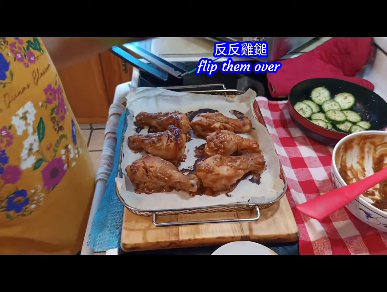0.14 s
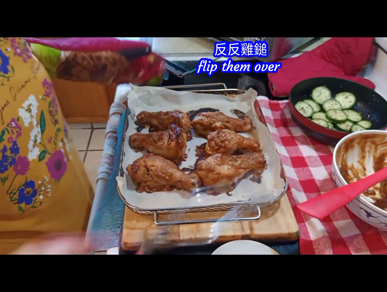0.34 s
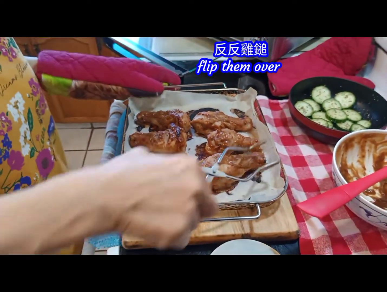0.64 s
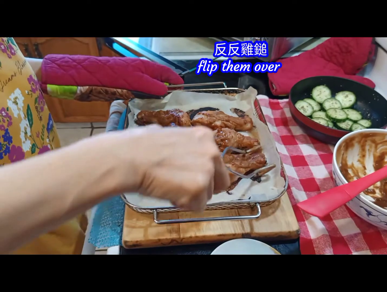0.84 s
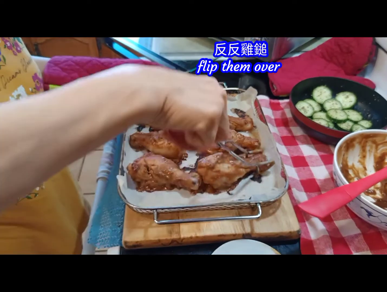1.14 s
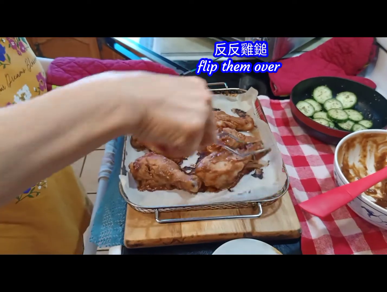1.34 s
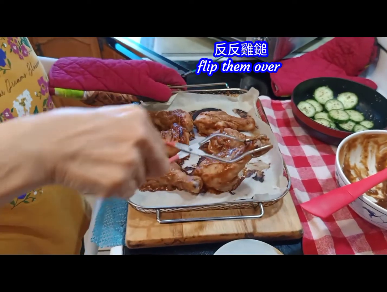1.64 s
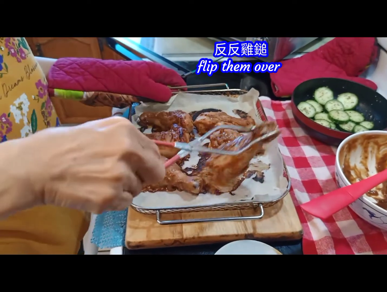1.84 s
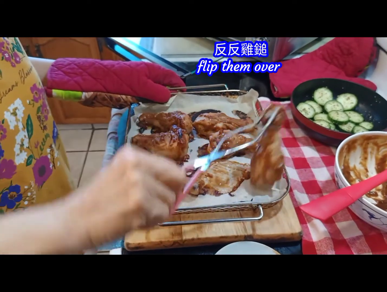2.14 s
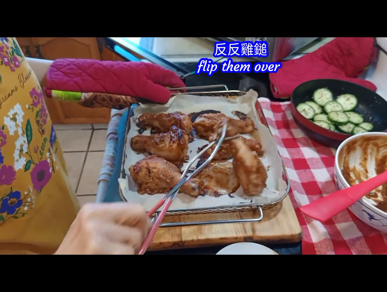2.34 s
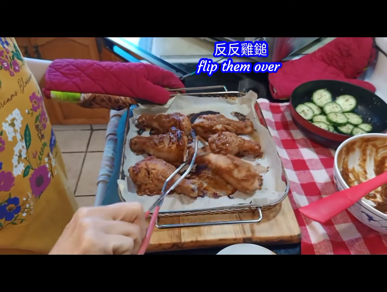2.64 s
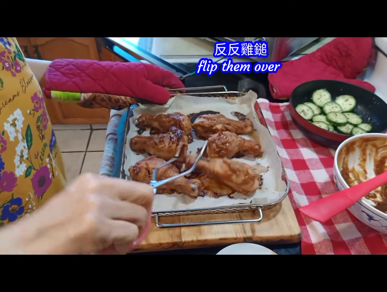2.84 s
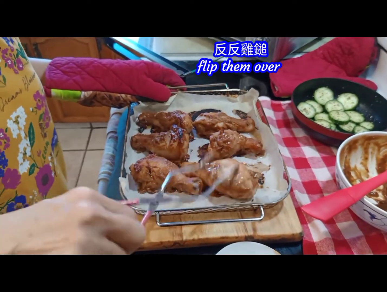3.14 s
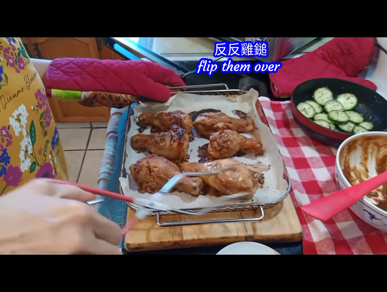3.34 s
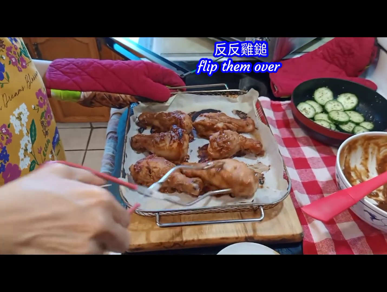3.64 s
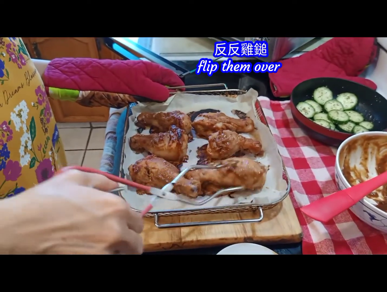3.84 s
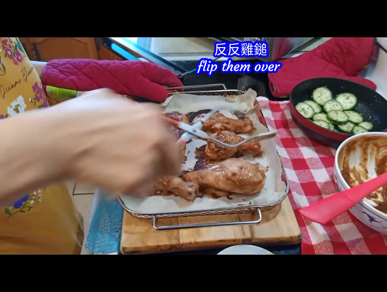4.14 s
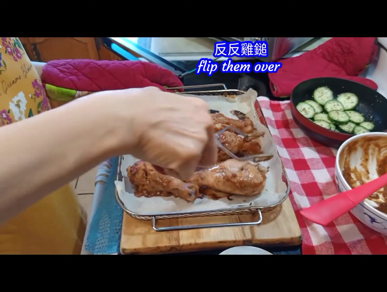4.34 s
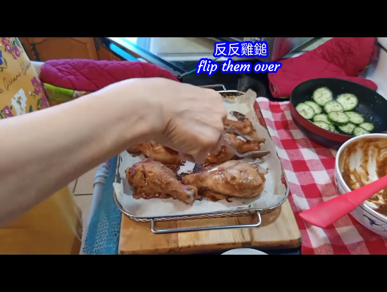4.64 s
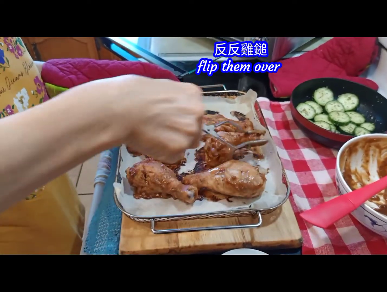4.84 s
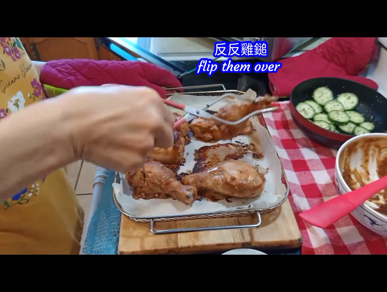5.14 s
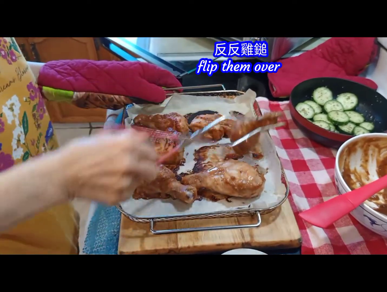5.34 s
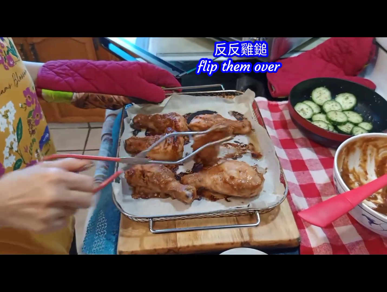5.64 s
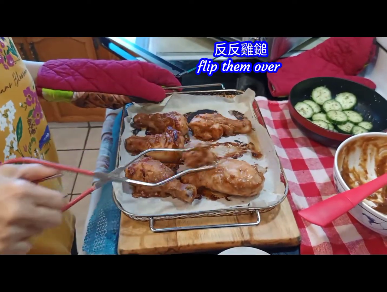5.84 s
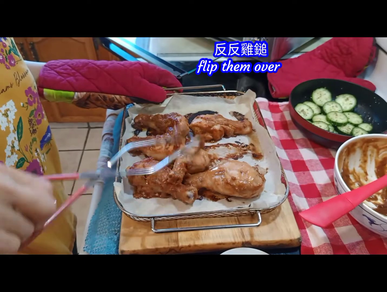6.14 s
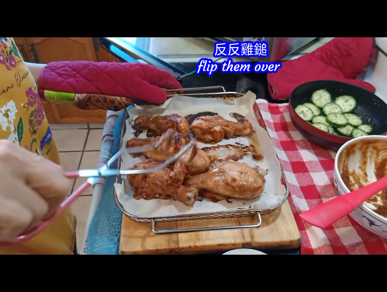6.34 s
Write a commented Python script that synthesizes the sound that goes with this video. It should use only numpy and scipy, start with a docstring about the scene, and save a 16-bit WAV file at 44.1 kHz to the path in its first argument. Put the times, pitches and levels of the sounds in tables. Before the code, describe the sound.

Tongs turn chicken legs on paper in a wire rack, heard close and dry. A quick double clink opens, followed by a rough burst of metallic rattling, paper snaps and low thumps, then separate small ticks and faint scrapes. The later part is sparse, with muffled distant knocks, a late bright click and a quiet airy room hum.

```python
"""Steel tongs turn roast chicken legs on baking paper in a wire basket, close to a phone in a small tiled
kitchen. The tongs tick on bone and wire (noise bursts through resonances) and twice clink together (decaying
sines). Paper scrapes (shaped, grainy noise) and snaps (short bright bursts, also used for a few light ticks);
low thumps sound (noise in resonances). Dull knocks come from further off in the house (reverberant noise, a low
mode); a faint hum of air lies under all."""
import sys
import numpy as np
from scipy import signal
from scipy.fft import rfft, irfft, next_fast_len
from scipy.io import wavfile
from scipy.ndimage import uniform_filter1d

SR = 44100
rng = np.random.default_rng(int(sys.argv[2]) if len(sys.argv) > 2 else 0)


def master(y):
    """Save y as 16-bit WAV."""
    cut = np.clip(np.atleast_2d(y).T, -1, 1)
    pcm = np.round(cut * 32767)  # scale
    wavfile.write(sys.argv[1], SR, pcm.astype(np.int16))


N = 285356  # samples


def amp(db):
    """Decibel law: the amplitude ratio grows tenfold every 20 dB."""
    return 10 ** (np.asarray(db) / 20)


def unit(x):
    """Normalisation to a root mean square of 1."""
    return x / np.sqrt(np.mean(x ** 2) + 1e-20)


def along(points, hz):
    """Interpolation of (pitch_hz, value) points on a logarithmic frequency axis."""
    point_hz, value = np.transpose(points)
    return np.interp(np.log(hz + 1), np.log(point_hz + 1), value)


def filtered(x, response):
    """Linear filtering: the spectrum of x times a complex response of frequency."""
    size = next_fast_len(len(x) + 4096)
    spectrum = rfft(x, size) * response(np.fft.rfftfreq(size, 1 / SR))
    return irfft(spectrum, size)[:len(x)]


def add(track, start_s, x):
    """Superposition: mixes x into track at start_s."""
    part = track[round(start_s * SR):][:len(x)]
    part += x[:len(part)]


def patchy(shape, bands):
    """Band-wise fluctuation: random levels smoothed over neighbouring bands and 14 frames."""
    return unit(uniform_filter1d(uniform_filter1d(rng.standard_normal(shape), bands, 0), 14, 1))


def resonance(f, centre_hz, width_hz):
    """Damped oscillator: its response is 1 at the centre and falls away on both sides."""
    return 1j * f * width_hz / (centre_hz ** 2 - f * f + 1j * f * width_hz)


def tail(t60s, rise_s):
    """Reverberation: a fresh noise answer of energy 1, each frequency dying at its own speed."""
    hz, t, z = signal.stft(rng.standard_normal(SR // 2), SR, nperseg=256)
    decay = amp(-60 * t / along(t60s, hz)[:, None])
    x = signal.istft(z * decay, SR, nperseg=256)[1][:SR // 2]
    x = x * (1 - np.exp(-np.arange(len(x)) / SR / rise_s))
    return x / np.linalg.norm(x)


# spectrum of the air noise: pitch_hz, relative level_db
AIR_SPECTRUM = [(25, -6.5), (100, 0.5), (300, -5), (900, -11.5), (3000, -17.5), (15000, -16)]


def air():
    """Stationary broadband noise: room hum and hiss, gently patchy in time and frequency."""
    z = signal.stft(rng.standard_normal(N), nperseg=512)[2]
    noise = signal.istft(z * amp(1.3 * patchy(z.shape, 6)), nperseg=512)[1][:N]
    return amp(-54.0) * filtered(unit(noise), lambda hz: amp(along(AIR_SPECTRUM, hz)))


def lingering_mode():
    """Room mode: a low tone that swells, wavers in pitch and lingers."""
    pitch_hz, wander_hz = 550, 30  # mean, rms deviation
    t60_s, rise_s, ends_s = .6, .08, .21
    t = np.arange(SR // 2) / SR
    hz = pitch_hz + wander_hz * unit(uniform_filter1d(rng.standard_normal(len(t)), size=500))
    tone = np.sin(2 * np.pi * np.cumsum(hz) / SR)
    swell = 1 - np.exp(-(t / rise_s) ** 3)
    return tone * amp(-60 * t / t60_s) * swell / (1 + (t / ends_s) ** 10)


# reverberation of the house: pitch_hz, t60_s
HOUSE_T60 = [(150, 0.26), (700, 0.37), (4000, 0.35), (13000, 0.09)]
# spectrum of a far blow: pitch_hz, relative level_db
KNOCK_SPECTRUM = [(60, -31), (190, -7.5), (285, -17.5), (380, -13), (480, -23.5), (660, -16), (760, -17),
                  (1500, -17.5), (5000, -23), (15000, -22)]
# far knocks: start_s, relative level_db, relative boom_db
FAR_KNOCKS = [(0.5489, -36.5, -12.5), (1.9984, -33.5, -14.5), (3.6069, -32.5, -15.5),
              (4.7277, -49.5, -10.5), (5.177, -33.5, -15), (5.6337, -38.5, -31.5)]


def knocks():
    """Diffuse sound: far blows heard through the house; the boom builds later than the clack."""
    out, split_hz = np.zeros(N), 750
    for start_s, level_db, boom_db in FAR_KNOCKS:
        clack = filtered(tail(HOUSE_T60, 0.0025),
                         lambda hz: amp(along(KNOCK_SPECTRUM, hz)) * (hz > split_hz))
        boom = filtered(tail(HOUSE_T60, 0.035),
                        lambda hz: amp(along(KNOCK_SPECTRUM, hz) + boom_db) * (hz <= split_hz))
        blow = amp(level_db + 38.5) * (clack + amp(17.5) * boom)
        add(out, start_s, blow + amp(level_db + boom_db + 2.5) * lingering_mode())
    return out


def hollow(pitch_hz, width_hz, t60_s, rise_s):
    """Narrow-band noise: one resonance filters dying noise into a wavering low tone."""
    t = np.arange(SR // 2) / SR
    noise = rng.standard_normal(len(t))
    tone = unit(filtered(noise, lambda f: 1 / (1 + ((f - pitch_hz) / width_hz) ** 2)))
    return tone * amp(-60 * t / t60_s) * (1 - np.exp(-t / rise_s))


# resonances shared by the low thumps: pitch_hz, t60_s
THUMP_MODES = [(155, 0.14), (235, 0.29), (360, .13), (455, .14), (746, 0.044)]
# low thumps: start_s, relative level_db, favoured_hz
LOW_THUMPS = [(.724, -18.5, 718), (0.795, -35.5, 459), (0.852, -39, 450.4), (1.471, -58.5, 233),
              (2.351, -58, 197), (3.621, -50.5, 370), (4.636, -47.5, 342), (4.645, -46.5, 155),
              (4.733, -54, 356), (4.909, -59.5, 235), (5.623, -49, 477)]


def thumps():
    """Modal excitation: each low thump sounds a few resonances, most those near its favoured pitch."""
    out = np.zeros(N)
    reach_db = 55.5  # a mode one octave from the favoured pitch is this much weaker
    width = .12  # of a resonance, as a share of its pitch
    for start_s, level_db, favoured_hz in LOW_THUMPS:
        for pitch_hz, t60_s in THUMP_MODES:
            mode_db = level_db - reach_db * np.log2(pitch_hz / favoured_hz) ** 2
            add(out, start_s, amp(mode_db) * hollow(pitch_hz, width * pitch_hz, t60_s, 0.0084))
    return out


# resonances of the basket's wires: pitch_hz
BASKET_WIRES = [1354, 1785, 2090, 2310, 2710, 3780, 4510, 6000]


def wires(boost_db, width_hz, scatter_db):
    """Sum of resonances: the basket's wires, excited by freshly drawn amounts at each call."""
    gains = amp(boost_db + scatter_db * rng.standard_normal(len(BASKET_WIRES)))
    return lambda f: 1 + sum(g * resonance(f, hz, width_hz) for hz, g in zip(BASKET_WIRES, gains))


def hump(hz, centre_hz, width):
    """Band-pass law: a flat-topped hump on a log axis, scaled for its bandwidth."""
    return 1 / (1 + (np.log(hz / centre_hz) / width) ** 4) / np.sqrt(centre_hz * width)


def edge(hz, low_hz):
    """Power-law spectrum: falls above low_hz and is cut off steeply below it."""
    return (low_hz / hz) ** 2.2 / (1 + (low_hz / hz) ** 14) / np.sqrt(low_hz)


def grain_noises():
    """Stick-slip friction: clumped, crackling grains, and a smoother version for wire and drag."""
    clumps = unit(uniform_filter1d(rng.standard_normal(N), size=90))
    # small catches of very unlike size, about 110 a second
    slips = (rng.random(N) < 110 / SR) * amp(4 * rng.standard_normal(N) + 3)
    decay = amp(-60 * np.arange(SR // 20) / SR / 0.014)
    crackle = signal.fftconvolve(slips, decay)[:N]
    grains = (amp(3 * clumps - 4) + crackle) * rng.standard_normal(N)
    smooth = amp(1.5 * clumps) * rng.standard_normal(N)  # wire and board even out the grains
    return unit(grains), unit(smooth)


# strokes over paper and wire: start_s (full pressure), length_s, relative hiss_db, wire_db and drag_db,
# wire_hz, spread (share of pitch), drag_hz (lowest of the drag)
PAPER_STROKES = [(0.063, 0.056, -63, -45, -32.5, 2470, 0.12, 556),
                 (0.15, 0.12, -94, -78, -56.5, 1920, 0.13, 840),
                 (0.306, 0.73, -68.5, -81.5, -66.5, 2304, 0.26, 575),
                 (0.731, 0.17, -24.5, -36, -28, 2300, 0.33, 625),
                 (0.906, 0.097, -41.5, -38.5, -50, 2260, 0.31, 720),
                 (0.986, 0.087, -37, -48, -37, 2370, 0.22, 693),
                 (1.091, .12, -37.5, -55, -41.5, 2390, 0.28, 950),
                 (1.253, 0.091, -40, -55, -44, 2260, 0.46, 1140),
                 (1.547, 0.05, -46.5, -45.5, -46, 2170, 0.23, 950),
                 (1.684, 0.064, -68, -60, -61.5, 1260, 0.12, 1900),
                 (2.351, 0.02, -32.5, -40, -49, 2700, 0.25, 1020),
                 (2.397, 0.12, -60, -46.5, -51.5, 2890, 0.05, 1790),
                 (2.48, 0.061, -63, -50.5, -96, 2230, 0.074, 1120),
                 (2.606, 0.089, -83, -47.5, -52, 2050, 0.06, 2600),
                 (2.768, 0.078, -57.5, -64, -66.5, 2060, 0.053, 844),
                 (3.079, 0.39, -57, -62.5, -67, 2140, 0.15, 750),
                 (3.713, 0.1, -57.5, -60, -56.5, 2140, 0.45, 600),
                 (4.14, 0.079, -63, -58.5, -52, 1585, .03, 2690),
                 (4.738, 0.13, -60, -60, -51.5, 2030, 0.54, 450),
                 (5.037, 0.023, -61, -72, -58, 5640, .07, 3960),
                 (5.618, 0.032, -40, -49, -58.5, 2250, 0.4, 400),
                 (5.689, 0.038, -51.5, -67, -51.5, 2197, 0.46, 580)]


def paper():
    """Friction noise: rubbing grains heard as a hiss, a singing wire and a low drag."""
    rise, sag, fall = 900, 57.5, 449.5  # dB/s: a stroke bites, eases throughout, lifts off (on top of sag)
    hz, t, (grains, even) = signal.stft(grain_noises(), SR, nperseg=512, noverlap=384)
    hz = hz[:, None] + 1
    rubbed = 0
    for start_s, length_s, hiss_db, wire_db, drag_db, wire_hz, spread, drag_hz in PAPER_STROKES:
        u = t - start_s
        push_db = rise * np.minimum(u, 0) - sag * np.maximum(u, 0) - fall * np.maximum(u - length_s, 0)
        hiss = amp(hiss_db - 4.5) * (hump(hz, 5200, 1.0) + amp(-52.5) * (hz > 7000))
        wire = amp(wire_db - 8.0) * hump(hz, wire_hz, abs(spread))
        drag = amp(drag_db) * edge(hz, drag_hz)
        rubbed = rubbed + amp(push_db) * (hiss * grains + (wire + drag) * even)
    patches = amp(2.5 * patchy(grains.shape, 2))  # the rubbing's level wavers slightly from band to band
    rubbing = signal.istft(rubbed * patches, SR, nperseg=512, noverlap=384)[1][:N]
    return amp(34) * filtered(rubbing, wires(boost_db=1, width_hz=90, scatter_db=1.5))


# knots of a contact's spectrum: pitch_hz
COLOUR_KNOTS = [60, 560, 1000, 2300, 5200, 12000]


def colour(body_db, top_db, wire_hz):
    """Contact spectrum: a tilt set by where it lands, the touched wire standing out."""
    levels_db = [body_db - 59.0, body_db - 27, body_db + 3.5, body_db - 1.0, 0, top_db + 18.5]
    knots = list(zip(COLOUR_KNOTS, levels_db))
    ripple_db = 2.0 * rng.standard_normal(40)  # no two touches sound alike
    basket = wires(boost_db=-1, width_hz=140, scatter_db=4)

    def spectrum(hz):
        """Product of responses: tilt with ripple, touched wire, whole basket."""
        tilt = amp(along(knots, hz) + np.interp(hz / 400, np.arange(40), ripple_db))
        touched = 1 + amp(12) * resonance(hz, wire_hz, 110)
        return tilt * touched * basket(hz)
    return spectrum


LEAD = 256  # samples kept ahead of a contact for what its filter spreads backwards
# reverberation of the kitchen: pitch_hz, t60_s
KITCHEN_T60 = [(300, 0.1), (1500, 0.2), (5000, 0.13), (12000, 0.027)]


def contact(level_db, t60_s, spectrum):
    """Impact excitation: a sharp crack and a short, uneven rattle; the kitchen answers."""
    delay_s = 0.0018  # the crack follows the rattle's start by this delay
    t = np.arange(SR // 10) / SR
    rattle = amp(-60 * t / max(t60_s, .002)) * (1 - np.exp(-(t / 0.0025) ** 2))
    crack = amp(-6.5 - 60 * np.maximum(t - delay_s, 0) / 0.0023) * (t > delay_s)
    shape = rattle + crack
    chatter = amp(2.9 * unit(uniform_filter1d(rng.standard_normal(len(t)), size=40)))
    noise = shape * chatter * rng.standard_normal(len(t))
    burst = filtered(np.pad(noise, (LEAD, 0)), spectrum)
    # the energy expected of this shape and spectrum replaces the chance energy of the noise
    impulse = np.eye(1, len(t), LEAD)[0]
    typical = np.linalg.norm(shape) * np.linalg.norm(filtered(impulse, spectrum))
    tick = amp(level_db) * burst * typical / np.linalg.norm(burst)
    wet = amp(-10.5) * signal.fftconvolve(tick, tail(KITCHEN_T60, 0.00067))
    return np.pad(tick, (0, len(wet) - len(tick))) + wet


# single snaps of the paper, and a few light tong ticks played the same way: start_s, relative level_db
PAPER_SNAPS = [(0.5005, -37), (0.7006, -18), (0.9113, -26.5), (.976, -31), (.999, -20.5), (1.074, -19.5),
               (1.101, -41), (1.108, -37.5), (1.122, -28), (1.147, -25.5), (1.1627, -17.5), (1.184, -28),
               (1.197, -25), (1.207, -24), (1.261, -39.5), (1.2695, -23.5), (1.518, -29.5), (1.558, -26.5),
               (1.711, -34), (1.814, -42.5), (1.875, -40), (2.4595, -35), (2.715, -24), (2.7546, -32),
               (2.852, -37.5), (2.9258, -29.5), (3.0654, -37.5), (3.4396, -41), (3.7594, -34), (4.803, -38),
               (4.8978, -38.5)]


def snaps():
    """Sudden buckling: creases give way in thin, bright, brief bursts; a few light tong ticks sound the same
    way."""
    out = np.zeros(N)
    for start_s, level_db in PAPER_SNAPS:
        crease = colour(-18.5, -31.5, rng.uniform(890, 2800))
        add(out, start_s - LEAD / SR, contact(level_db + 2.0, .007, crease))
    return out


# free modes of the steel tong arms: pitch_hz, relative level_db, t60_s
ARM_MODES = [(1856, -37, 0.066), (3360, -36.5, 0.072), (4130, -30.5, 0.049), (4440, -51, 0.24),
             (5954, -38, 0.037), (6670, -41.5, 0.13)]
# the arms meet in the air: start_s, relative level_db
ARM_CLINKS = [(0.0304, -11.5), (0.0449, -7.5)]


def clinks():
    """Free vibration: the tong arms meet and each mode rings as a decaying sine."""
    out, t = np.zeros(N), np.arange(SR // 4) / SR
    for start_s, level_db in ARM_CLINKS:
        for pitch_hz, mode_db, t60_s in ARM_MODES:
            strength_db = level_db + mode_db + rng.normal(0, 1.5)
            add(out, start_s, amp(strength_db - 60 * t / t60_s) * np.sin(2 * np.pi * pitch_hz * t))
    return out


# contacts of the tongs: start_s, relative level_db, body_db and top_db (of the spectrum),
# t60_s (rattle), wire_hz (touched wire)
TONG_TICKS = [(0.028, 3.5, -39, -42, 0.014, 1830), (0.045, -16, -17.5, -31.5, 0.026, 2636),
              (0.6806, -16.5, -15, -35, 0.034, 3750), (0.7234, -5, -9.5, -25, 0.029, 2270),
              (0.7302, -7.5, -8.5, -33, 0.048, 1914), (0.7711, 1.5, -15, -34, 0.019, 2270),
              (0.7791, -1, -12.5, -35, 0.024, 2558), (0.788, 2, -41, -24.5, 0.037, 2440),
              (0.7978, -7.5, -5, -15.5, 0.032, 2800), (0.8545, 3.5, -5, -17.5, 0.014, 2324),
              (0.9809, -13.5, -1, -25, 0.028, 1250), (1.01, -19, 3.5, -19.5, 0.033, 2380),
              (1.0234, -10.5, -10.5, -25, .015, 2400), (1.046, -9.5, -9, -24, .021, 1785),
              (1.0834, -12, -15, -26.5, 0.023, 2430), (1.1331, -7.5, -5.5, -20.5, .02, 2810),
              (1.2132, -9, 1, -23, 0.022, 2160), (1.233, -18, -30, -44, 0.043, 1990),
              (1.467, -1.5, -10, -31, 0.028, 1986), (1.6838, -35, 16.5, -46, 0.024, 1270),
              (1.741, -36.5, -18, -49, 0.0241, 2006), (2.31, -25.5, -10, -22.5, 0.077, 3000),
              (2.319, -20.5, -11.5, -22, 0.072, 2520), (2.349, -12, -17, -12.5, 0.015, 2420),
              (2.4866, -16.5, -21.5, -28, 0.028, 1970), (2.595, -17, -20.5, -40, 0.027, 4300),
              (2.641, -15.5, -21.5, -44, 0.028, 2140), (2.708, -5.5, -31, -31.5, 0.02, 2010),
              (2.814, -32, -9, -44, 0.041, 2010), (2.9344, -26.5, -20.5, -29, 0.05, 2180),
              (3.1623, -18.5, -20, -44, 0.037, 2710), (3.174, -17, -25, -18, 0.012, 2300),
              (3.201, -18.5, -17.5, -27, .026, 1570), (3.831, -33.5, -12.5, -43, 0.034, 1670),
              (3.944, -23.5, -16.5, -51.5, 0.023, 2220), (4.1156, -9, -19.5, -29.5, 0.038, 1620),
              (4.6245, -24.5, -21.5, -45.5, 0.092, 1190), (4.6321, -30, -6.5, -28.5, 0.07, 1960),
              (5.5806, -23.5, -11.5, -45, 0.02, 1720), (5.5943, -3, -28.5, -44, 0.008, 3140),
              (5.6192, -13.5, -32, -23.5, 0.031, 2480), (6.142, -23.5, -14, -76, .022, 3160),
              (6.2932, -21.5, -17.5, -61, 0.015, 4120)]


def tongs():
    """Impact and free vibration: the tips strike bone and basket; twice the arms meet and ring."""
    out = clinks()
    for start_s, level_db, body_db, top_db, t60_s, wire_hz in TONG_TICKS:
        add(out, start_s - LEAD / SR, contact(level_db - 9, t60_s, colour(body_db, top_db, wire_hz)))
    return out


def scene():
    """Superposition of all sources, from background to tongs, in one channel."""
    return (air() + knocks() + thumps() + paper() + snaps() + tongs())[None]


def suppress(x, margin_db, depth_db):
    """Spectral subtraction: bands sinking towards their own quiet level are turned down; tails end early."""
    z = signal.stft(x, nperseg=512, noverlap=384)[2]
    power = np.abs(uniform_filter1d(uniform_filter1d(np.abs(z) ** 2, 3, 0), 9, 1)) + 1e-20
    quieter_half = np.sort(power, axis=1)[:, :power.shape[1] // 2]
    quiet = np.median(quieter_half, axis=1, keepdims=True)
    gain = np.sqrt(np.clip(1 - amp(2 * margin_db) * quiet / power, amp(-2 * depth_db), 1))
    return signal.istft(z * gain, nperseg=512, noverlap=384)[1][:N]


# response of the phone's microphone, its port peaking near 5 and 15 kHz: pitch_hz, level_db
MIC_RESPONSE = [(30, -8.5), (70, 3.5), (1500, 4.5), (2300, 8), (3200, 6), (5000, 11.5), (6000, 7.5),
                (7000, -1), (8300, -11), (13400, -14), (15000, 2), (15600, -13.5), (16400, -29)]


def record(dry):
    """Transducer chain: port resonances, noise suppression, soft limiting and a band limit."""
    ceiling, top_hz = .7, 16700  # amplitude at which peaks round off; band limit
    heard = filtered(dry[0], lambda hz: amp(along(MIC_RESPONSE, hz)))
    heard = suppress(heard, margin_db=-1.5, depth_db=3.0)
    heard = heard / (1 + (heard / ceiling) ** 4) ** .25
    return filtered(heard, lambda hz: hz < top_hz)[None]


dry = scene()
out = record(dry)
master(out)
```